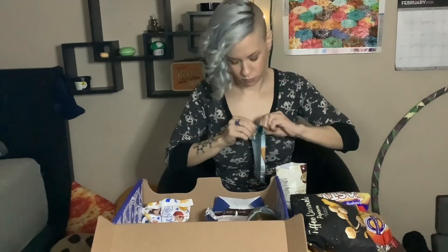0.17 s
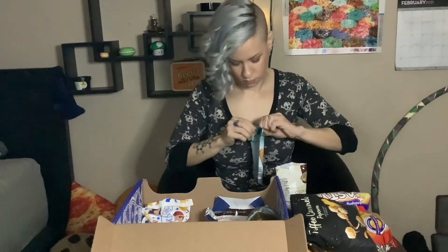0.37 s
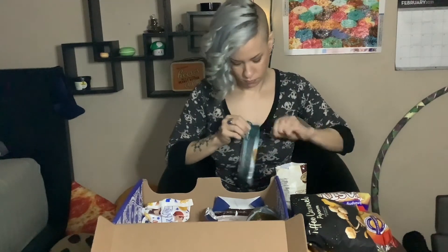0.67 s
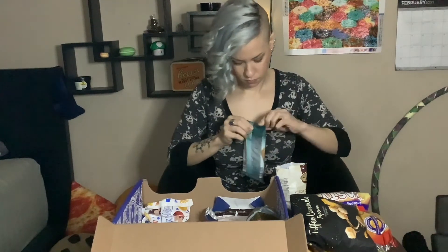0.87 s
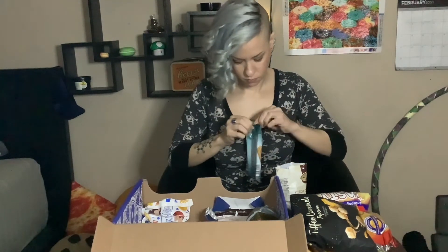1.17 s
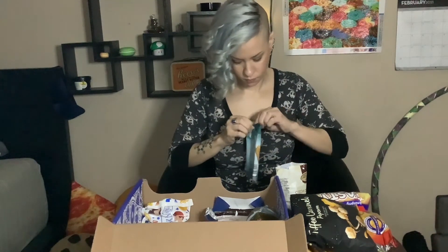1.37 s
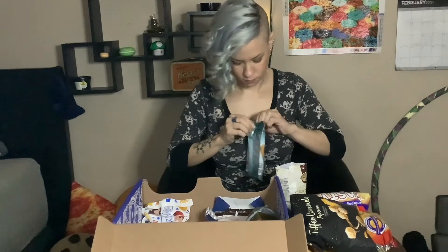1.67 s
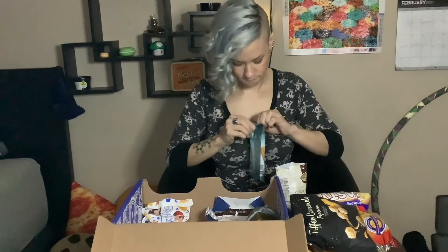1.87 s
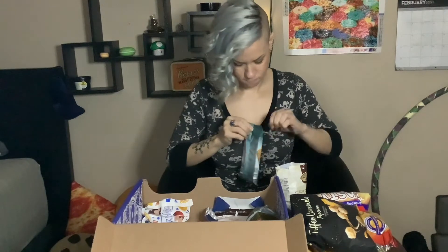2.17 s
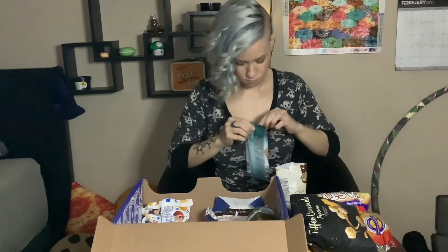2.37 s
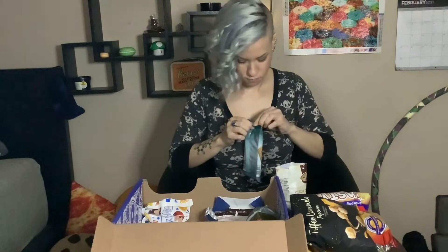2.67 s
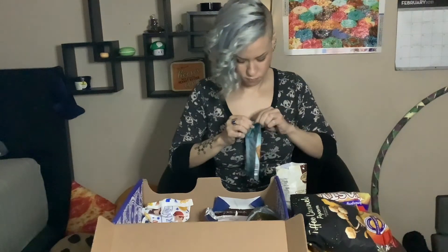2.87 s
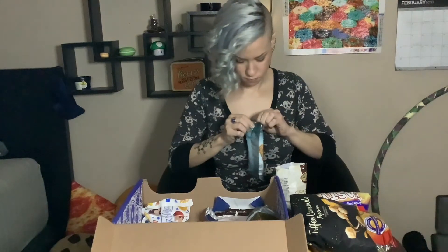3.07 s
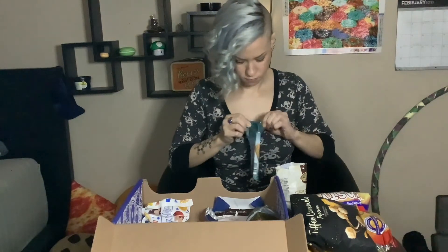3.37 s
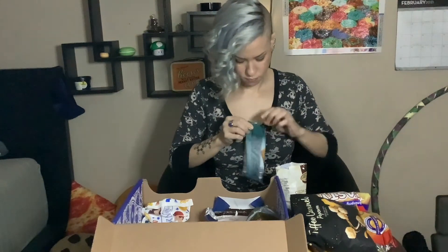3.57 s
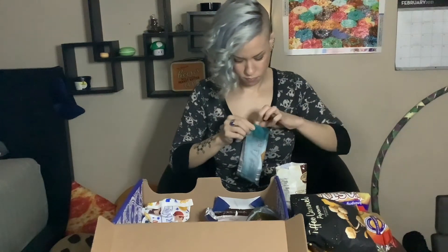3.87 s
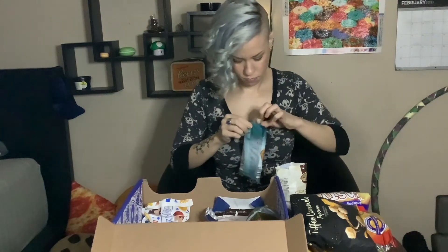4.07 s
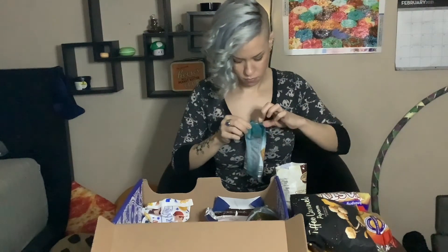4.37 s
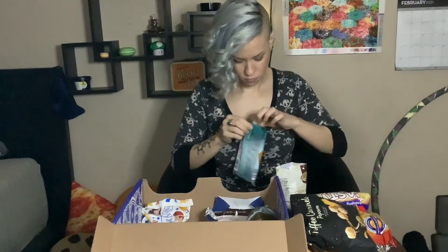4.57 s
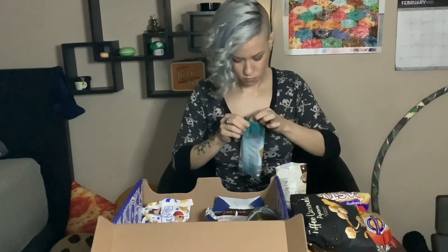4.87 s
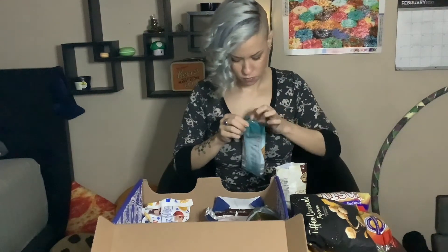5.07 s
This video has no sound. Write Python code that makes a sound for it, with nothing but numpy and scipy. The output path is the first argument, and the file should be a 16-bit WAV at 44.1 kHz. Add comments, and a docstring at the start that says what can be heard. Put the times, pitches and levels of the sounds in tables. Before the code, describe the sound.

Crisp plastic film crinkles irregularly: a lively first burst, scattered small ticks, one standout snap near two seconds, quieter picking, a rapid cluster of crackles past three seconds, then loose light clicks. Heard from nearby in a quiet furnished room with brief early echoes and a short tail, over steady low background hum and soft hiss.

```python
"""In a small furnished room, fingers work at the seam of a small plastic snack wrapper.
Creases in the film buckle one by one: each snap is a short ring, a low thud and a bright tick.
Finer crackle, made of tiny random clicks through ringing filters, fills the gaps between them.
Single echoes and a short noise tail answer the wrapper, over a low hum and faint steady hiss."""
import sys
import numpy as np
from scipy import signal
from scipy.fft import rfft, irfft
from scipy.io import wavfile

SR = 44100
rng = np.random.default_rng(int(sys.argv[2]) if len(sys.argv) > 2 else 0)


def put_to_file(sound):
    """Save the sound as 16-bit audio at rate SR, in the file named by the first command-line argument."""
    columns = np.atleast_2d(sound).T  # one column per channel
    safe = np.clip(columns, -1, 1)
    whole_steps = np.round(safe * 32767)
    wavfile.write(sys.argv[1], SR, whole_steps.astype(np.int16))


N = 230025   # length in samples


def from_db(db):
    """Decibels to gain."""
    return 10 ** (np.asarray(db) / 20)


def rms_one(x):
    """Scale to rms 1."""
    return x / np.sqrt(np.mean(x ** 2) + 1e-20)


def like_energy(rows, model):
    """Scale each row to the energy of the matching row of model."""
    wanted = np.sum(model ** 2, axis=1, keepdims=True)
    present = np.sum(rows ** 2, axis=1, keepdims=True)
    return rows * np.sqrt(wanted / present)


def at_hz(points, hz, column=1):
    """Read a column of a table on a log-frequency axis."""
    points = np.array(points)
    return np.interp(np.log(np.maximum(hz, 1)), np.log(points[:, 0]), points[:, column])


def coloured(x, spectrum):
    """Filter x by a curve of gain in dB against frequency."""
    hz = np.arange(len(x) // 2 + 1) * SR / len(x)
    return irfft(rfft(x) * from_db(at_hz(spectrum, hz)), len(x))


def butter(x, hz, kind):
    """Butterworth filter of design order 2 along the last axis."""
    return signal.sosfilt(signal.butter(2, hz, kind, fs=SR, output="sos"), x)


def resonate(x, hz, r):
    """Two-pole resonator at hz; its ringing shrinks by the factor r every sample."""
    return signal.lfilter([1, 0, -1], [1, -2 * r * np.cos(2 * np.pi * hz / SR), r * r], x)


def wavelet(t, hz, cycles):
    """A vibration that swells and dies within a few cycles; envelope peak 1."""
    swell = np.e * t * hz / np.maximum(cycles, .7)
    return swell * np.exp(1 - swell) * np.sin(2 * np.pi * hz * t)


# spectrum of the steady hiss, relative: f/Hz, level/dB (per Hz)
HISS_SPECTRUM = [(22, -40), (48, -1.5), (100, -4.5), (280, -7.5), (650, -14), (900, -22.5), (1700, -25),
                 (3500, -24), (5900, -23), (6500, -27.5), (8000, -25), (16000, -26.5)]
HISS_DB = -65.5   # overall rms
# lines of the appliance hum: f/Hz, width/Hz, level/dB (rms)
HUM_LINES = [(64.5, 14, -73.5), (119.3, 5.1, -74.5), (237.5, 5.8, -74.5)]


def room_tone():
    """Broad steady noise plus an appliance's wavering lines, each noise through a narrow resonance."""
    out = from_db(HISS_DB) * rms_one(coloured(rng.standard_normal(N), HISS_SPECTRUM))
    for hz, width, level_db in HUM_LINES:
        line = resonate(rng.standard_normal(N + SR), hz, np.exp(-np.pi * width / SR))
        out += from_db(level_db) * rms_one(line[SR:])   # skip the first second, while the resonance builds
    return out


# diffuse room tail: f/Hz, level/dB (starting gain), t60/s
TAIL_BANDS = [(404, -17.5, 0.29), (960, -27.5, 0.32), (2500, -26.5, 0.28), (5000, -27, 0.29),
              (9660, -24.5, 0.24), (14700, -33, 0.27)]


def room_tail():
    """Response of the diffuse room: noise that builds quickly and dies band by band."""
    t = np.arange(SR // 2) / SR
    build = 1 - np.exp(-t / 0.00035)
    edges = 200 * 2 ** np.arange(0, 7, .5)   # half-octave bands, Hz
    white = rng.standard_normal((2, len(t)))
    out = 0
    for k, (low, high) in enumerate(zip(edges, edges[1:])):
        hz = np.sqrt(low * high)
        decay = from_db(at_hz(TAIL_BANDS, hz) - 60 * t / at_hz(TAIL_BANDS, hz, column=2))
        out = out + butter(white[k % 2], [low, high], "band") * decay * build   # neighbours differ in noise
    return out


# nearby surfaces: t/s (delay), level/dB (re direct sound), f/Hz (thinned below)
SURFACES = [(.0007, -7, 400), (.0042, -13, 5000), (.0061, -13, 600), (.0103, -15, 500), (.0114, -17, 500),
            (.014, -18, 900), (.021, -18, 500), (.0225, -18, 1500)]


def early_sound():
    """Response of the direct path and the single echoes, each thinned in the lows by its surface."""
    steps = np.arange(SR // 20)
    out = 1.0 * (steps == 0)
    for delay, level_db, thin_hz in SURFACES:
        out += from_db(level_db) * butter(1.0 * (steps == round(delay * SR)), thin_hz, "high")
    return out


# base level of the fine crackle while the fingers pull: t/s, level/dB
PULL_LEVEL = [(0.0, -58), (0.12, -67), (0.4, -58), (0.65, -53.5), (0.8, -68.5), (1.291, -68), (1.65, -68.5),
              (1.82, -65), (2.09, -71), (2.69, -76.5), (3.43, -56), (3.53, -56), (3.78, -78.5),
              (4.01, -59.5), (4.46, -61.5), (4.7, -73), (5.06, -55), (5.22, -83.5)]
CRACKLE_PER_S, CRACKLE_SPREAD_DB = 760, 6.5   # mean rate, mean of the random boost before its limit
CRACKLE_LOW_HZ, CRACKLE_HIGH_HZ = 434, 12400
CRACKLE_TILT_DB = 0.73   # per octave, towards the low pitches


def crackle():
    """Tiny creases give way at random, each ringing down 60 dB in about three cycles."""
    level_db = np.interp(np.arange(N) / SR, *np.transpose(PULL_LEVEL))
    boost_db = CRACKLE_SPREAD_DB * np.minimum(rng.exponential(1, N), 4)
    sizes = from_db(boost_db) * rng.choice([-1, 1], N)
    born = rng.random(N) < CRACKLE_PER_S / SR
    dealt = rng.integers(0, 16, N)   # which of 16 pitches each crease gets
    out = np.zeros(N)
    for k, hz in enumerate(np.geomspace(CRACKLE_LOW_HZ, CRACKLE_HIGH_HZ, num=16)):
        r = from_db(-60 * hz / (3.0 * SR))
        tilt_db = CRACKLE_TILT_DB * np.log2(4000 / hz)
        clicks = sizes * born * (dealt == k) * from_db(level_db + tilt_db)
        out += resonate(clicks + 1e-18, hz, r) * (1 - r)
    return out


# creases buckling: t/s, ring level/dB, ring f/Hz, ring length/cycles,
# thud level/dB (gain re ring gain), tick level/dB (gain re ring gain)
BUCKLES = [(.009, -52, 3490, 1.57, -10.5, 1), (0.0816, -54, 3170, 1.5, 5.5, 0),
           (.088, -49.5, 8900, 3.8, -7, 9), (0.0956, -42.5, 5000, 1.2, -11, 4),
           (0.1382, -52.5, 4300, 3.1, 0, -3), (0.1822, -33.5, 5320, 3.1, -19, 14.5),
           (0.2843, -38, 7800, 5, -0.5, 16.5), (0.3916, -54.5, 2420, 3, 11.5, 3),
           (0.4729, -41, 5430, 3.4, -11, 0), (0.5274, -47.5, 5400, 3.5, -1, 12),
           (.5479, -32.5, 2740, 1, -2.5, 13.5), (0.5507, -35.5, 3470, 3.8, -4, 0),
           (0.5536, -32.5, 4770, 2.1, -22, 13), (0.5707, -36, 3440, 0.84, -9, -1.5),
           (0.6002, -45.5, 5260, 4.2, -4, 19.5), (0.6667, -47, 5340, 4.9, -2, 1),
           (0.6726, -36.5, 5400, 1.37, -8, 5), (.7253, -32.5, 4460, 1.4, -9, 10),
           (.9423, -46, 3820, 2.3, -3, 8.5), (1.077, -37, 2700, 0.8, -3, -17),
           (1.1095, -43.5, 5860, 2.1, 0, 14), (1.1325, -49.5, 3140, 1.3, -19, 18.5),
           (1.2642, -61.5, 7800, 1.6, -26, 23), (1.4058, -52, 3220, 1.1, -16, 15),
           (1.4246, -49.5, 7160, 2.4, 0, 15), (1.431, -48.5, 4940, 1.7, -8, 8),
           (1.49, -54, 3000, 0.78, -11, 14), (1.5257, -47, 3930, 1.84, -7.5, 13.5),
           (1.6545, -45.5, 5000, 2.3, 5, 9.5), (1.6895, -47, 2500, 1.6, -18, 14),
           (1.701, -43.5, 1180, 0.63, 7.5, 17.5), (1.717, -38.5, 6700, 4, -18, 14),
           (1.7221, -42.5, 8060, 6.8, 0, 14), (1.748, -51, 7600, 4.7, -16, 9),
           (1.7553, -44.5, 5630, 3.4, -11, 19.5), (1.7771, -39, 3560, 2.7, -0.5, 7.5),
           (1.986, -60, 4850, 3.7, -14, 0), (2.0347, -17.5, 3760, 1.07, -12, 1.5),
           (2.0729, -42, 3320, 1.1, -6, 15), (2.093, -41, 3060, 1.7, -10, 3), (2.119, -38, 5040, 3.1, 0, 1),
           (2.1558, -43.5, 4700, 4.2, -0.5, 12), (2.185, -55, 4970, 4.4, 1, 1),
           (2.417, -58, 5240, 3.4, -3, 11), (2.431, -61.5, 5260, 3.5, -8, 20.5),
           (2.499, -58, 5250, 1.9, -2, 18), (2.5068, -39, 4500, 0.89, -12, 3.5),
           (2.5457, -48.5, 5560, 3.9, -10, 11.5), (2.5995, -47, 8000, 4.4, -9, 8),
           (2.611, -44, 1950, 1.6, -5.5, -18), (2.665, -40, 3900, 1.37, -6, -14),
           (2.7335, -40, 6940, 4.1, -29, -9), (2.8411, -46, 3400, 4.1, 3.5, 19.5),
           (2.905, -48.5, 1900, 1.2, 0.5, 12), (2.9193, -47.5, 2530, 2.7, -1, 11),
           (2.963, -56.5, 2220, 1.8, -8, 18), (2.988, -52, 3600, 6.4, 5, 23.5),
           (2.9911, -43, 3350, 2.5, 6.5, 14), (3.0765, -39.5, 5200, 5.3, -6, 11.5),
           (3.1275, -53.5, 5900, 2.4, -23, 20), (3.1354, -43, 1800, 1.4, -9.5, -21),
           (3.154, -51, 2680, 0.89, -16, -15), (3.1833, -52, 4950, 2.1, -20, 9),
           (3.19, -54, 3030, 0.99, -26, 20.5), (3.2271, -43, 5840, 2.5, -18, 25),
           (3.2342, -27.5, 3880, .7, -3.5, 12.5), (3.2484, -26.5, 2970, 0.88, -4, 2),
           (3.2547, -31.5, 5230, 3.8, -2.5, -3), (3.2648, -32, 6000, 3.6, -17, 8),
           (3.2727, -29, 1420, 0.29, 0, 18.5), (3.2781, -35, 2800, 0.86, 1, -6),
           (3.2942, -31, 2800, 1.2, -7, 11), (3.3051, -32, 2640, 1.8, -7, 13),
           (3.4225, -43.5, 2400, 1, 0.5, -9), (3.435, -44, 4350, 2, -9, 8),
           (3.4749, -31.5, 4860, 1.4, -3.5, -3), (3.5385, -42, 4540, 3.8, 3, 15),
           (3.5439, -34, 4900, .77, -13, -13), (3.6491, -58, 2780, 1.8, 3, -10),
           (3.7298, -35.5, 5660, 1.5, -2, 8.5), (3.8106, -50.5, 2530, 1, 0, -12),
           (3.9649, -47, 1860, 1.2, 2, 14.5), (4.041, -63, 2950, 1, 8, -7),
           (4.1153, -41.5, 2270, 1.3, -12, -8), (4.1188, -40, 5000, 1.9, -20, 6),
           (4.1895, -56.5, 1800, 1.9, 8, -11), (4.2109, -56, 3720, 1.3, 5, -3),
           (4.2267, -45, 3760, 4.9, -4, 14), (4.2375, -40, 5080, 2.4, -7, 13),
           (4.2709, -48, 1920, 1.9, 5, -5), (4.283, -46, 2370, 1.7, -11, 5),
           (4.3346, -54, 5260, 4.9, 7, 23.5), (4.338, -50, 5750, .83, -23, 25),
           (4.431, -48, 4310, 1.4, -10, -4), (4.4477, -40, 5400, 3, -4, -1),
           (4.4502, -46, 5500, 4.8, -17, 16.5), (4.4677, -50.5, 3660, 3.9, -5, 2),
           (4.5157, -46, 2570, 1.1, -1, 9), (4.5603, -47, 2600, 1.4, -14, 10.5),
           (4.616, -48.5, 1780, 0.99, -1, -14), (4.6365, -38, 3800, 1.14, -11, 11.5),
           (4.784, -61, 2980, 4.5, 7.5, -9), (4.8355, -60, 2815, 3.9, -8, -15),
           (4.8484, -42.5, 3320, 2.1, -1.5, 12.5), (4.8878, -39.5, 4000, 2.4, -3, 11),
           (4.9099, -45, 7400, 4, 3.5, 7), (4.9203, -40.5, 5340, 2.2, -21, 3),
           (5.0335, -40, 5000, 1.2, -21, -11), (5.0806, -65, 4800, 2.5, 11.5, -3),
           (5.1481, -46, 5540, 2, -7, 6), (5.1946, -39, 3940, 2.6, -13.5, 7.5)]
# pitch of the thuds, lower in some moments and higher in others, sometimes changing abruptly,
# probably with the size of the air pocket: t/s, f/Hz
THUD_PITCH = [(0, 1310), (.4, 690), (.7, 1050), (1.08, 780), (1.7, 523), (1.78, 1080), (2.9, 1110),
              (3.54, 1020), (3.73, 620), (4.33, 1190), (4.9, 630), (5.2, 1090)]
THUD_CYCLES, BESIDE_DB = 0.64, -4   # thud length; gain of the panels alongside, re the main panel
TICK_HZ, TICK_S = 5000, .0006       # high-pass corner; decay time of the tick's noise


def snaps():
    """Each buckle is a brief ring of the film panel, a low thud of pushed air and a bright tick."""
    s, ring_db, hz, cycles, thud_db, tick_db = np.transpose(BUCKLES)[:, :, None]
    t = np.arange(384) / SR
    chance = rng.standard_normal((len(BUCKLES), 2, len(t)))

    clean = wavelet(t, hz, cycles)
    # pitch ratios of the panels alongside
    larger, smaller = rng.uniform([.5, 1.4], [.7, 1.9], (len(BUCKLES), 2)).T[:, :, None]
    beside = wavelet(t, hz * larger, cycles * larger) - wavelet(t, hz * smaller, cycles * smaller)
    rough = 1 + .4 * chance[:, 0]
    ring = like_energy((clean + from_db(BESIDE_DB) * beside) * rough, clean)

    thud_hz = np.interp(s, *np.transpose(THUD_PITCH))
    thud = butter(wavelet(t, thud_hz, THUD_CYCLES), 134, "high")

    jolt = 1.0 * (t == t[4])   # one clean jolt amid the ragged settling of the crease
    settling = .3 * chance[:, 1] * np.exp(-t / TICK_S)
    tick = like_energy(butter(jolt + settling, TICK_HZ, "high"), jolt[None])

    shapes = from_db(ring_db) * (ring + from_db(thud_db) * thud + from_db(tick_db) * tick)
    out = np.zeros(N + len(t))
    np.add.at(out, np.round(s * SR).astype(int) + np.arange(len(t)), shapes)
    return out[:N]


# microphone colour on the wrapper and its room sound: f/Hz, level/dB (gain)
MIC_COLOUR = [(300, -17), (2000, 9.5), (5900, 7.5), (6500, 1.5), (7800, 4), (15000, 0.5)]


def scene():
    """The wrapper heard through the room and the microphone's colour, over the room tone."""
    fine = crackle()
    wrapper = signal.fftconvolve(snaps() + fine, early_sound())[:N]
    for direction in range(3):   # crumpled film sends each snap with another fine colour in every direction
        wrapper += signal.fftconvolve(snaps() + fine, room_tail())[:N] / np.sqrt(3)
    return (coloured(wrapper, MIC_COLOUR) + room_tone())[None]


CUTOFF_HZ = 15750


def record(dry):
    """The top is cut steeply by an elliptic low-pass."""
    return signal.sosfilt(signal.ellip(12, .5, 70, CUTOFF_HZ, fs=SR, output="sos"), dry)


dry = scene()
out = record(dry)
put_to_file(out)
```